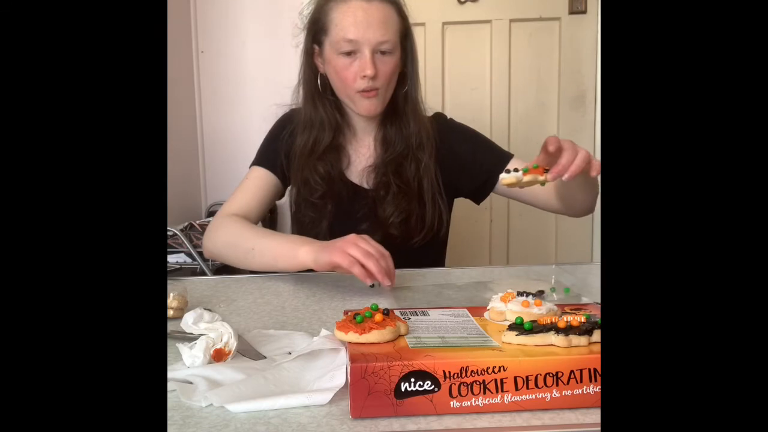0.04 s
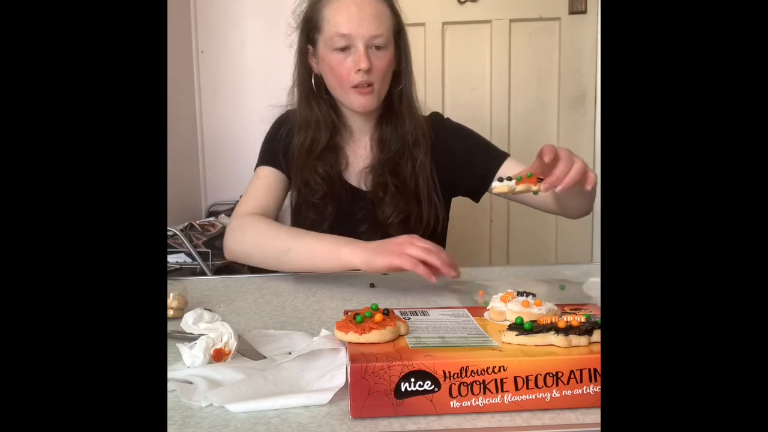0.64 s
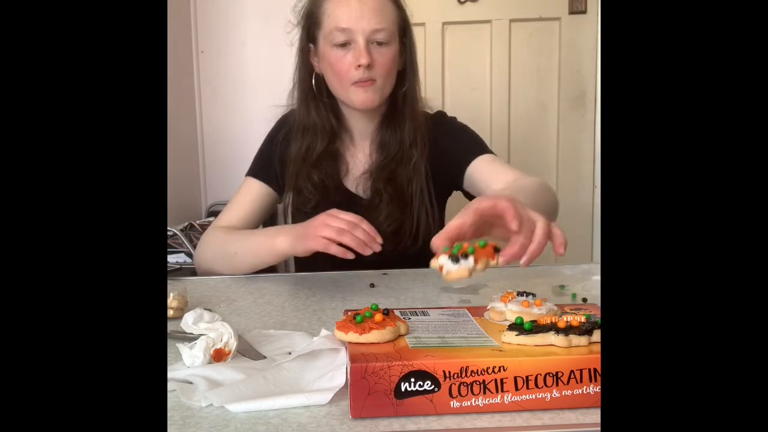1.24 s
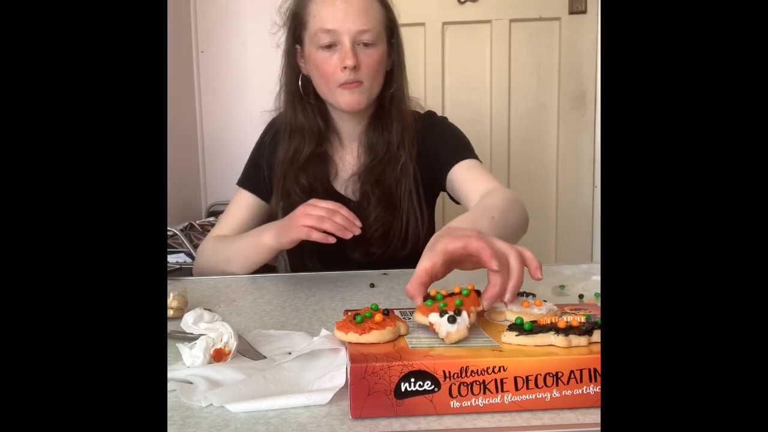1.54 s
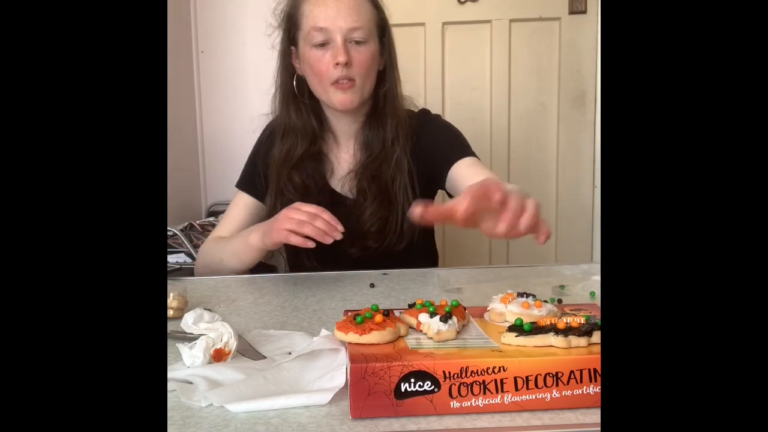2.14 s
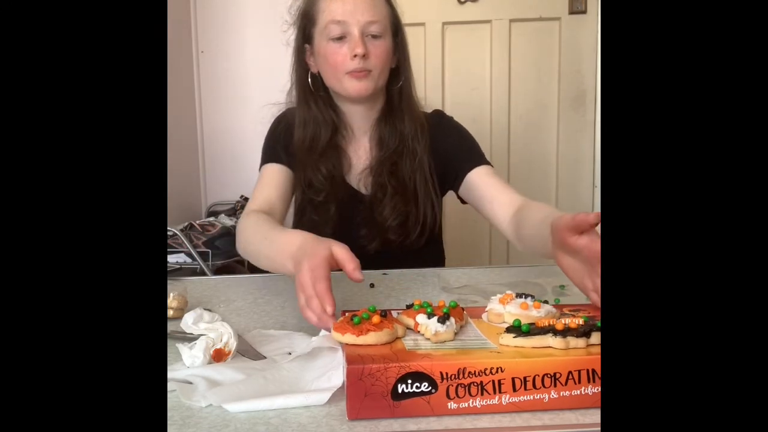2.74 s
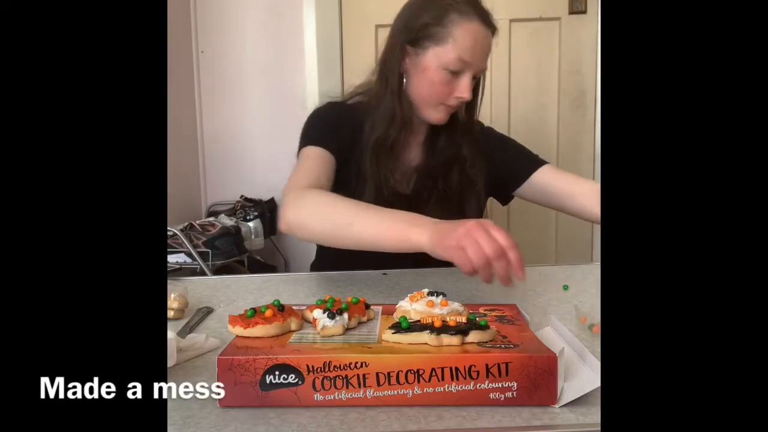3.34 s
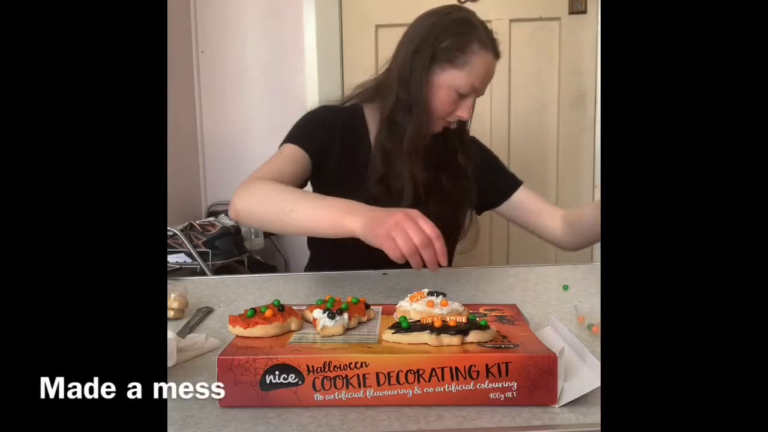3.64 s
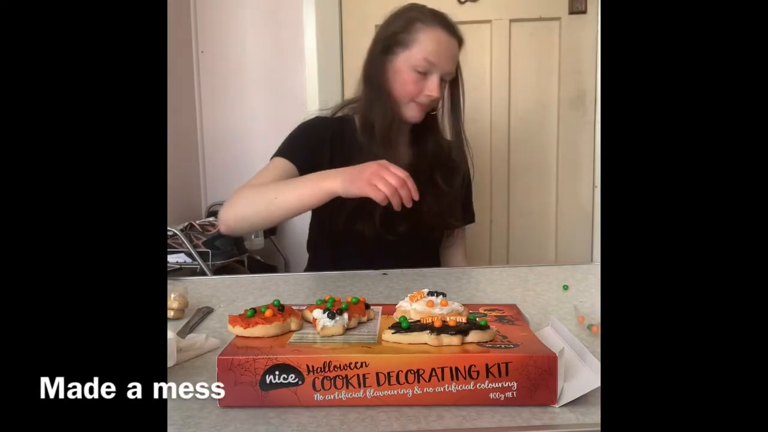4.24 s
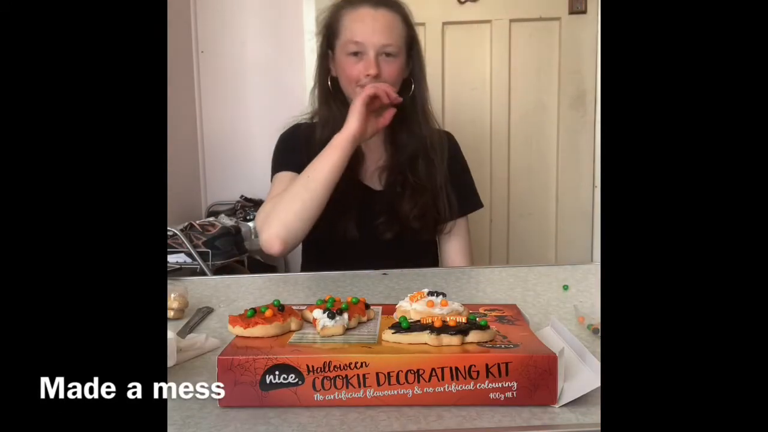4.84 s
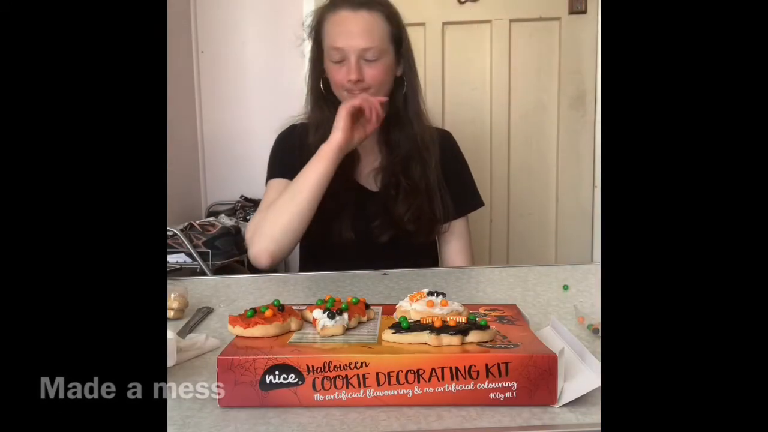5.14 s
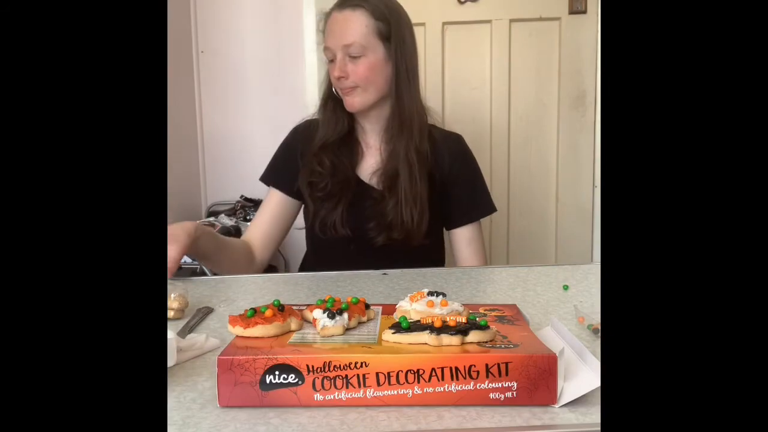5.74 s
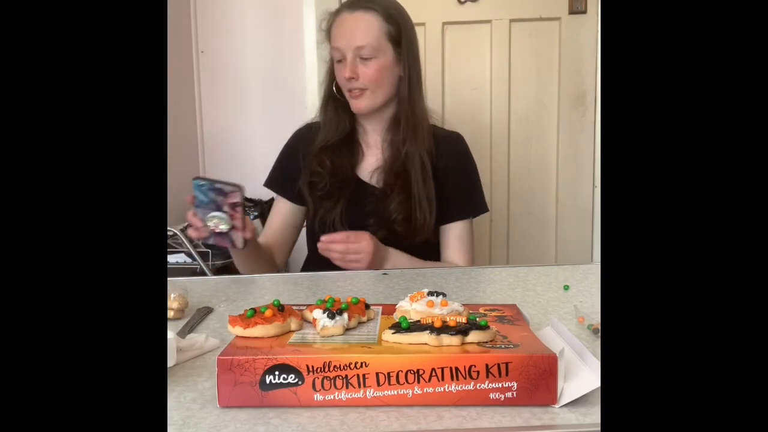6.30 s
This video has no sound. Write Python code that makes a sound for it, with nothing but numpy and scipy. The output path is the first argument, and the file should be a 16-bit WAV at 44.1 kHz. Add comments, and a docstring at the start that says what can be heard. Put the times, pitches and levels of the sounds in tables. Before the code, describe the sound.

A hand slides over a table, a biscuit knocks and crunches onto a cardboard box, then fingers softly sweep up sugar sprinkles.

```python
"""A small, quiet room, with the microphone close to a cardboard box on a table.
First a hand slides over the table a little farther back, fingertips ticking on the top.
About a second and a half in, decorated biscuits are set down: the lid drums and the dry crust crunches.
Then the hand sweeps up spilt sugar sprinkles, rubbing and hissing, and the beads tick and scatter.
Near the end something is tapped and dragged briefly across the table top."""
import sys
import numpy as np
from scipy import signal
from scipy.fft import rfft, irfft
from scipy.io import wavfile

SR = 44100
rng = np.random.default_rng(int(sys.argv[2]) if len(sys.argv) > 2 else 0)


def inscribe(sig):
    """Save sig as 16-bit PCM at rate SR to the path in sys.argv[1].

    A 1-D sig is mono; a 2-D sig holds one channel per row.
    Samples are clipped to [-1, 1] before scaling.
    """
    pcm = np.round(np.clip(np.atleast_2d(sig).T, -1, 1) * 32767)
    wavfile.write(sys.argv[1], SR, pcm.astype(np.int16))


N = 285238
TIME = np.arange(N) / SR

# Background noise floor. Each row: frequency in Hz, relative level in dB.
NOISE_FLOOR_COLOUR = [(15, -51), (25, -19), (70, -1), (97, -5.5), (134, -7.5), (223, -10.5), (335, -12.5),
                      (427, -13), (489, -13), (1520, -21), (1740, -21.5), (2410, -21.5), (8590, -27),
                      (14800, -27), (16000, -41)]
# Reverberation of the room. Each row: frequency in Hz, seconds to fall by 60 dB.
ROOM_DECAY = [(100, 0.36), (500, 0.31), (3000, 0.33), (7000, 0.2), (15000, 0.39)]

# An arm bumping the table. Each row: start in seconds, strength in dB.
ARM_BUMPS = [(1.268, -48), (3.255, -51)]
# Low modes of the table. Each row: frequency in Hz, gain in dB, seconds to fall by 60 dB.
TABLE_MODES = [(100.6, -6, 0.3), (171, 6.5, 0.17), (192, -23, .12)]

# Strokes over the table. Each row: kind, time of full pressure in seconds, swell in seconds,
# hold in seconds, level of the rub in dB, level of the gritty hiss in dB.
HAND_STROKES = [("slide", 0, 0.022, .005, -57, -59), ("slide", .154, .026, .016, -57, -57.5),
                ("slide", .389, .39, .019, -49.5, -51), ("slide", .495, .236, .036, -54, -46),
                ("slide", .572, .11, .013, -52.5, -56.5), ("slide", .686, .012, .006, -52, -57.5),
                ("slide", .837, .17, .018, -61, -63), ("slide", .929, .11, .3, -65, -69),
                ("touch", 2.475, .008, .02, -50.5, -56.5), ("sweep", 2.675, .065, .193, -50.5, -63),
                ("sweep", 2.726, .066, .014, -53, -57.5), ("sweep", 2.818, .044, .021, -52.5, -51),
                ("sweep", 2.933, .028, .027, -47.5, -57.5), ("sweep", 2.974, .048, .016, -55, -60.5),
                ("flick", 3.019, .045, .028, -48.5, -50), ("brush", 3.228, .21, .02, -54, -60),
                ("brush", 3.371, .015, .006, -57, -61), ("brush", 3.481, .01, .005, -57.5, -61.5),
                ("brush", 3.567, .03, .042, -55.5, -59.5), ("brush", 3.711, .073, .014, -65, -66),
                ("brush", 3.925, .05, .004, -65.5, -68), ("brush", 4.02, .027, .008, -66, -72.5),
                ("brush", 4.111, .065, .021, -72.5, -83), ("drag", 5.821, .035, .038, -47, -57.5),
                ("drag", 5.873, .08, .01, -52.5, -53.5)]
# Friction spectra, one for each kind of stroke. Each row: frequency in Hz, relative level in dB.
SLIDE_SPECTRUM = [(71, -6.5), (120, -10), (147, -5.5), (301, 0.5), (362, -5), (569, 1.5), (630, -5.5),
                  (856, -0.5), (1210, -7), (1900, -7.5), (2150, -1), (3050, -3.5), (7200, -10.5),
                  (14400, -21), (16000, -17)]
TOUCH_SPECTRUM = [(100, -2), (300, 2), (550, -3), (800, -9), (1000, -4), (2200, -7), (2900, -0.5),
                  (3400, -11), (4200, 0.5), (5000, -18), (6200, -9.5), (8900, -22), (10000, -22),
                  (16000, -29)]
SWEEP_SPECTRUM = [(71, -50), (120, -7), (204, -4.5), (410, -4), (656, -0.5), (1050, -6), (1190, 1),
                  (1940, -4.5), (2380, -0.5), (2700, -12), (3520, -8), (5410, -15), (6910, -13.5),
                  (11500, -17.5), (16000, -22)]
FLICK_SPECTRUM = [(71, -61), (120, -23), (188, 5), (246, -18), (284, -5.5), (493, -4), (805, -1),
                  (911, -13), (1460, -4.5), (3170, -2.5), (3590, -3.5), (4230, -3.5), (5990, -2.5),
                  (10400, -12.5), (16000, -10.5)]
BRUSH_SPECTRUM = [(150, -7.5), (350, -6), (600, -1), (830, 4), (1100, -4), (1400, -3.5), (1830, -3.5),
                  (2050, 1.5), (2350, -2.5), (3000, -4.5), (4000, -5), (5500, -10), (10000, -16.5),
                  (16000, -19.5)]
DRAG_SPECTRUM = [(150, -14), (400, -9.5), (580, -4.5), (750, -15), (1050, -3.5), (1400, -0.5), (1750, -6.5),
                 (2150, -4), (3100, -4.5), (3500, 4), (3950, -3.5), (7300, 2), (11000, -10), (16000, -16)]

# Fingertips, nails and other small taps. Each row: start in seconds, relative level of the body in dB,
# relative level of the snap in dB, top of the snap in Hz.
TAPS = [(.1, -51, -54, 4500), (.153, -61, -43, 11700), (.296, -41.5, -55, 8000), (.34, -52, -48, 12000),
        (.519, -38, -38, 10000), (.66, -45, -64, 4000), (.683, -40.5, -45, 7260), (2.478, -43, -47, 7900),
        (2.721, -34, -50, 6000), (2.805, -39, -43.5, 10700), (2.934, -37, -55, 9000),
        (3.033, -50, -36, 9500), (3.044, -47, -36, 9600), (3.369, -50, -51, 14000),
        (3.482, -52, -51, 14000), (3.568, -51, -52, 15000), (3.895, -58, -60, 15000),
        (4.726, -67, -53, 11100), (5.7306, -39.5, -51, 6000), (5.742, -46, -60, 5000),
        (5.86, -39.5, -42, 12000)]
# Spectrum of a tap on the table top. Each row: frequency in Hz, relative level in dB.
TAP_SPECTRUM = [(150, -8.5), (450, -2), (900, 0), (1500, -1), (2300, -1), (3400, -3), (5000, -7.5),
                (7500, -2.5), (11000, -8), (16000, -6.5)]

# Single sprinkles landing. Each row: start in seconds, relative level in dB, centre of the ping in Hz.
SPRINKLE_LANDINGS = [(1.174, -50, 14500), (1.22, -42.5, 14500), (3.311, -50, 14100), (3.436, -50, 14000),
                     (3.543, -50, 8000), (3.7, -53, 13000), (3.73, -51, 12000), (3.896, -54, 13500),
                     (3.921, -50.5, 10000), (6.169, -55, 14000)]
# Spectrum of loose sprinkles colliding. Each row: frequency in Hz, relative level in dB.
BEAD_SPECTRUM = [(300, -16), (900, -9), (2000, 5), (5000, -2), (9000, -4), (14000, 4), (16000, 1)]

# Biscuit and fingers landing on the box. Each row: start in seconds, relative strength in dB,
# cut-off of the contact in Hz, relative level of the crust's crack in dB.
BISCUIT_CONTACTS = [(1.2505, -55, 1400, -58), (1.4312, -27.5, 500, -56), (1.4517, -46, 1400, -55),
                    (1.6287, -35, 4600, -35), (1.644, -28.5, 4600, -32), (1.6513, -31, 3000, -33),
                    (1.6557, -20.5, 1250, -33), (1.6593, -31, 1100, -37), (1.6692, -18.5, 300, -41)]
# Spectrum of the cracking crust. Each row: frequency in Hz, relative level in dB.
CRUST_SPECTRUM = [(150, 4.5), (600, 13), (1000, 12), (1500, 14), (1900, 3), (2300, 8), (2750, -0.5),
                  (3450, 10.5), (3900, -0.5), (4300, -0.5), (5400, -4), (7000, -6.5), (11000, -14.5),
                  (16000, -20)]
# Modes of the cardboard box. Each row: frequency in Hz, gain in dB, seconds to fall by 60 dB.
BOX_MODES = [(95, -7.5, .26), (124, -15, .17), (211, -7, .13), (271, -15, .17), (305, 3, .11),
             (336, -6, .09), (440, -8, .08), (528, -2, .07), (587, -4, .08), (684, 4, .07), (735, 2, .04),
             (825, 3, .025), (1018, -2, .08), (1148, 0, .03), (1225, 6, .055), (1272, -5, .09),
             (1386, 6, .04), (1449, -2, .08), (1526, -10, .09), (1626, -11, .08), (2000, -3, .08),
             (2305, -7, .05), (3252, -3, .08), (3464, -5, .11)]


def from_db(db):
    """Decibels to gain."""
    return 10 ** (np.asarray(db) / 20)


def rms_one(x):
    """Scale to unit power."""
    return x / np.sqrt(np.mean(x ** 2) + 1e-20)


def at_hz(points, hz):
    """Read a table on a log-frequency axis."""
    known, values = np.transpose(points)
    return np.interp(np.log(np.maximum(hz, 1)), np.log(known), values)


def cut(x, hz, kind, order=2):
    """Butterworth low-, high- or band-pass."""
    sections = signal.butter(order, np.clip(hz, 10, .45 * SR), kind, fs=SR, output="sos")
    return signal.sosfilt(sections, x + 1e-18)


def coloured(x, spectrum, size=8192):
    """Causal (minimum-phase) filter with the given spectrum and unit energy."""
    bin_hz = np.arange(size // 2 + 1) * SR / size
    cepstrum = irfft(np.log(from_db(at_hz(spectrum, bin_hz))))
    cepstrum[1:size // 2] *= 2
    cepstrum[size // 2 + 1:] = 0
    response = irfft(np.exp(rfft(cepstrum)))
    return signal.fftconvolve(x, response / np.linalg.norm(response))[:N]


def drift(per_s):
    """Random wander through per_s new values a second."""
    knots = rng.standard_normal(N // 20)
    return np.interp(TIME * per_s, np.arange(len(knots)), knots)


def ring(force, modes):
    """Surface velocity at the struck spot: all modes start together and die away."""
    out = np.zeros(N)
    for hz, db, t60 in modes:
        radius = np.exp(-np.log(1000) / (t60 * SR))
        pole_real = radius * np.cos(2 * np.pi * hz / SR)
        out += from_db(db) * signal.lfilter([1, -pole_real], [1, -2 * pole_real, radius ** 2], force + 1e-18)
    return out


def add(track, s, sound):
    """Mix a short sound in at s seconds."""
    start = max(int(s * SR), 0)
    track[start:start + len(sound)] += sound[:N - start]


def push(hz, size=2000):
    """Force of one contact, unit area: the softer, the longer."""
    t = TIME[1:size]
    force = t * np.exp(-2 * np.pi * hz * t)
    return force / force.sum()


def crunch(decay_s, size=4000):
    """Burst of noise that dies away, as from tiny fractures."""
    return rng.standard_normal(size) * np.exp(-TIME[:size] / decay_s)


def grains(per_s, spread_db):
    """Random micro-collisions of uneven size."""
    sizes = from_db(spread_db * np.minimum(rng.exponential(1, N), 4))
    signs = rng.choice([-1, 1], N)
    return rms_one(sizes * signs * (rng.random(N) < per_s / SR))


def noise_floor():
    """Background noise floor: low rumble and thin hiss, probably the recorder's, sinking about halfway."""
    sinks_at_s, sink_s = 2.6, 0.77
    level_db = np.interp(TIME, [sinks_at_s, sinks_at_s + sink_s], [-61.6, -69.1])
    return rms_one(coloured(rng.standard_normal(N), NOISE_FLOOR_COLOUR)) * from_db(level_db)


def reflections(x, wet_db, build_s):
    """Diffuse sound off the near walls builds up, then each band dies at its own rate."""
    t = TIME[:SR // 2]
    edges_hz = np.geomspace(60, 18000, 9)
    tail = np.zeros(len(t))
    for low, high in zip(edges_hz, edges_hz[1:]):
        t60 = at_hz(ROOM_DECAY, np.sqrt(low * high))
        tail += cut(rng.standard_normal(len(t)), [low, high], "band") * np.exp(-np.log(1000) * t / t60)
    tail *= np.minimum(t / build_s, 1) ** 2
    return from_db(wet_db) * signal.fftconvolve(x, tail / np.linalg.norm(tail))[:N]


def arm_bumps():
    """Soft blows of an arm wake only the lowest modes of the table."""
    force = np.zeros(N)
    for s, db in ARM_BUMPS:
        add(force, s, from_db(db) * push(hz=297))
    return ring(force, TABLE_MODES)


def pressure(kind, fade_db_per_s):
    """Each stroke swells, holds and fades; gives the rub and hiss gains for all strokes of one kind."""
    swell_db = 20   # growth over the swell time
    grit_exponent = 1.18   # above 1, so the hiss comes later than the rub and leaves sooner
    t = TIME[::40]
    rub_power, grit_power = 0, 0
    for name, full_s, swell_s, hold_s, rub_db, grit_db in HAND_STROKES:
        if name == kind:
            rising = swell_db * (t - full_s) / swell_s
            fading = fade_db_per_s * (full_s + hold_s - t)
            press_db = np.clip(np.minimum(rising, fading), -100, 0)
            rub_power += from_db(rub_db + press_db) ** 2
            grit_power += from_db(grit_db + grit_exponent * press_db) ** 2
    return [np.interp(TIME, t, np.sqrt(power)) for power in (rub_power, grit_power)]


def stroke(kind, spectrum, fade_db_per_s, per_s, spread_db, judder_db):
    """Skin and sugar catch and slip on the table: the same contacts give a dull rub and a gritty hiss."""
    rub_gain, grit_gain = pressure(kind, fade_db_per_s)
    slips = coloured(grains(per_s, spread_db), spectrum) * from_db(judder_db * drift(per_s=90))
    rub = rms_one(cut(slips, 3200, "low", order=3)) * rub_gain
    hiss = rms_one(cut(slips, 4600, "high", order=3)) * grit_gain
    return rub + hiss


def hand():
    """The hand slides, touches down, sweeps, flicks and brushes the sprinkles, then drags something."""
    slide = stroke("slide", SLIDE_SPECTRUM, fade_db_per_s=155, per_s=9000, spread_db=3.0, judder_db=1.6)
    touch = stroke("touch", TOUCH_SPECTRUM, fade_db_per_s=310, per_s=13000, spread_db=2.5, judder_db=1.6)
    sweep = stroke("sweep", SWEEP_SPECTRUM, fade_db_per_s=480, per_s=7000, spread_db=3.5, judder_db=0.7)
    flick = stroke("flick", FLICK_SPECTRUM, fade_db_per_s=155, per_s=7000, spread_db=3.5, judder_db=1.8)
    brush = stroke("brush", BRUSH_SPECTRUM, fade_db_per_s=110, per_s=3500, spread_db=2.5, judder_db=0.7)
    drag = stroke("drag", DRAG_SPECTRUM, fade_db_per_s=380, per_s=15000, spread_db=1.1, judder_db=0.9)
    return slide + touch + sweep + flick + brush + drag


def taps():
    """Hard little contacts: a bright snap and a short answer from the table top."""
    body, snap = np.zeros(N), np.zeros(N)
    for s, body_db, snap_db, top_hz in TAPS:
        add(body, s, from_db(body_db + 2.5) * crunch(decay_s=0.0032))
        add(snap, s, from_db(snap_db + 8) * cut(crunch(decay_s=0.0018), top_hz, "low", order=4))
    body = cut(coloured(body, TAP_SPECTRUM), 3800, "low", order=3)
    snap = cut(coloured(snap, TAP_SPECTRUM), 3400, "high")
    return body + snap


def sprinkle_landings():
    """Each sugar bead lands with a very short click and a high ping of its own."""
    out = np.zeros(N)
    for s, db, hz in SPRINKLE_LANDINGS:
        click = from_db(db + 4) * crunch(decay_s=0.00053)
        ping = cut(click, [0.65 * hz, 1.34 * hz], "band")
        add(out, s, ping + from_db(-3.5) * cut(click, 600, "high"))
    return out


def sprinkle_scatter():
    """Loose beads roll ahead of the brushing fingers and knock together now and then."""
    _, grit_gain = pressure("brush", fade_db_per_s=70)
    hits = coloured(grains(per_s=90, spread_db=3.0), BEAD_SPECTRUM)
    return hits * grit_gain * from_db(-6.5)


def crust_crackle():
    """The dry crust crunches at each contact with the box."""
    cracks = np.zeros(N)
    for s, _, _, crack_db in BISCUIT_CONTACTS:
        add(cracks, s, from_db(crack_db) * crunch(decay_s=0.0086))
    return coloured(cracks, CRUST_SPECTRUM)


def disperse(x, spread_hz, q):
    """Bending waves run slower at low pitch; all-pass filters smear each blow in that way."""
    for hz in spread_hz:
        _, poles = signal.iirpeak(hz, q, fs=SR)
        x = signal.lfilter(poles[::-1], poles, x)
    return x


def biscuit_on_lid(gain_db):
    """The biscuit rocks down in several contacts, each drumming the cardboard lid."""
    force = np.zeros(N)
    for s, db, contact_hz, _ in BISCUIT_CONTACTS:
        add(force, s, from_db(db + gain_db) * push(contact_hz))
    drum = disperse(ring(force, BOX_MODES), spread_hz=[1010, 2100, 4000, 8000], q=1.36)
    return cut(drum, 70, "high")   # a small lid radiates no deep bass


def scene():
    """The box stands close to the microphone; the hands work farther back."""
    thuds = biscuit_on_lid(gain_db=-9) + arm_bumps()
    crust = from_db(1.0) * crust_crackle()
    rubbing = hand()
    ticking = taps()
    beads = sprinkle_landings() + sprinkle_scatter()
    wet = reflections(cut(thuds, 320, "high", order=1), wet_db=-11, build_s=0.017)
    wet += reflections(crust, wet_db=-6, build_s=0.014)
    wet += reflections(rubbing, wet_db=-10, build_s=0.005)
    wet += reflections(ticking, wet_db=-2.5, build_s=0.0081)
    wet += reflections(beads, wet_db=-4, build_s=0.008)
    return (thuds + crust + rubbing + ticking + beads + wet + noise_floor())[None]


def record(dry):
    """One microphone, which drops the deep bass; the top is cut steeply."""
    bass_hz, top_hz = 46, 15900
    thin = cut(dry, bass_hz, "high", order=3)
    return signal.sosfilt(signal.ellip(10, .2, 70, top_hz, fs=SR, output="sos"), thin)


dry = scene()
out = record(dry)
inscribe(out)
```